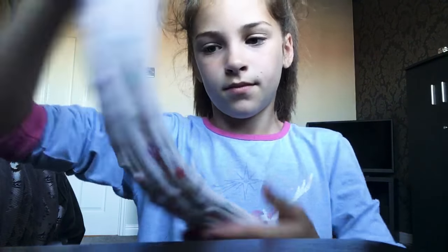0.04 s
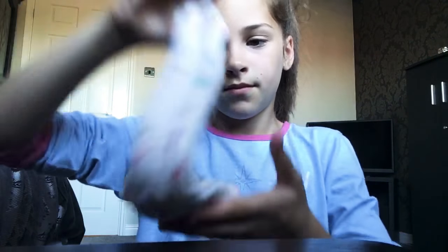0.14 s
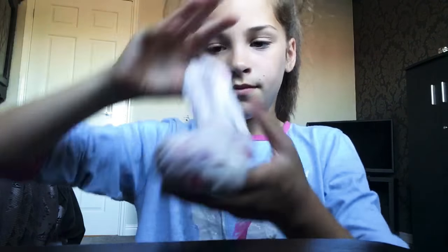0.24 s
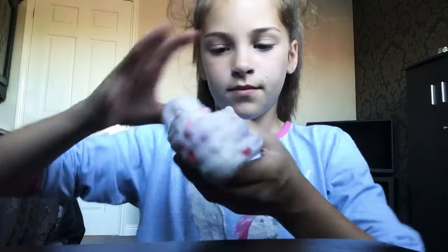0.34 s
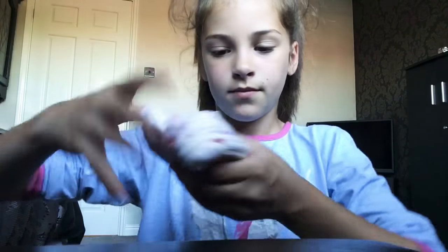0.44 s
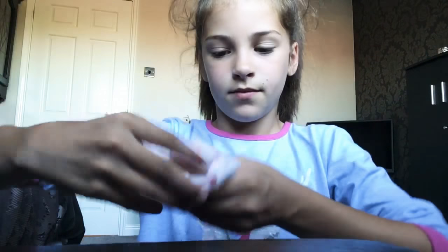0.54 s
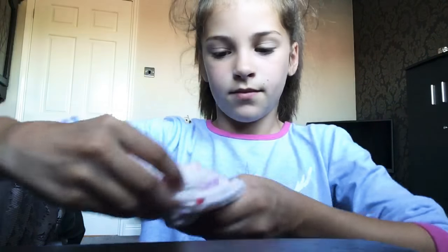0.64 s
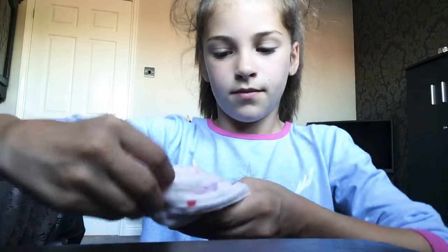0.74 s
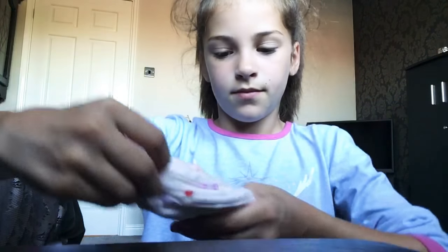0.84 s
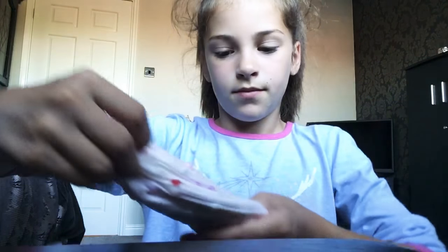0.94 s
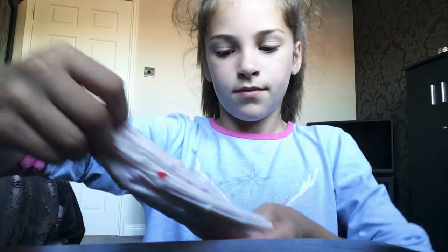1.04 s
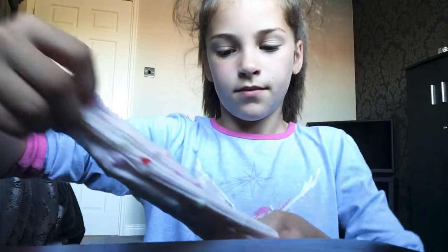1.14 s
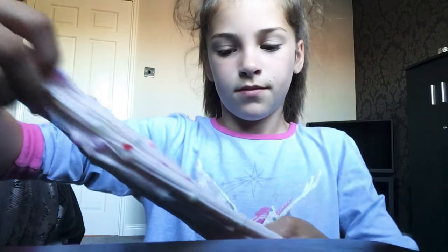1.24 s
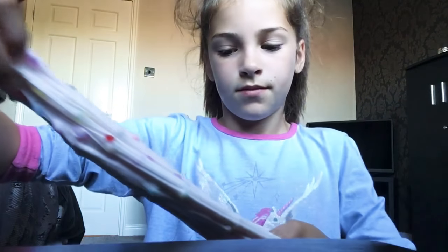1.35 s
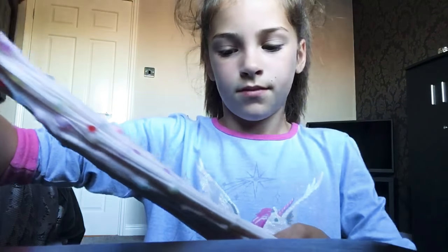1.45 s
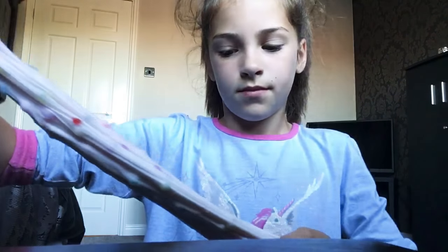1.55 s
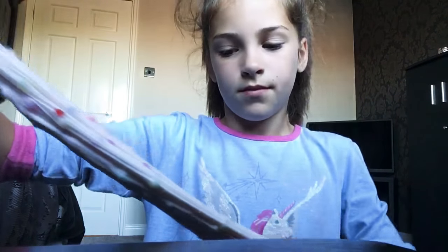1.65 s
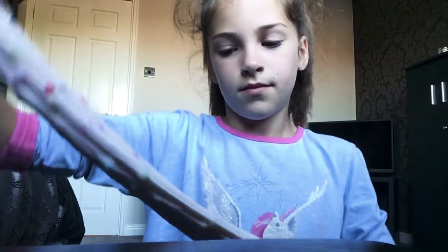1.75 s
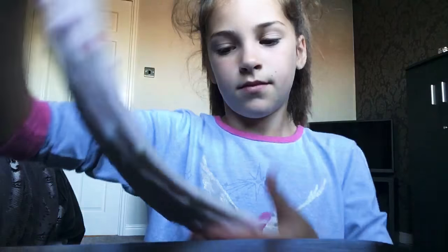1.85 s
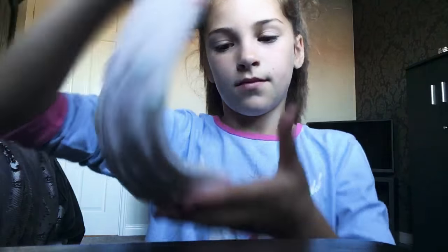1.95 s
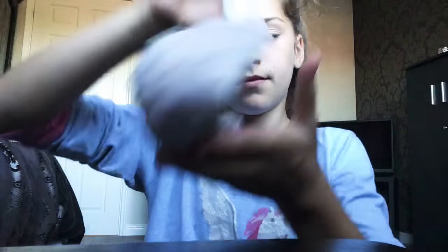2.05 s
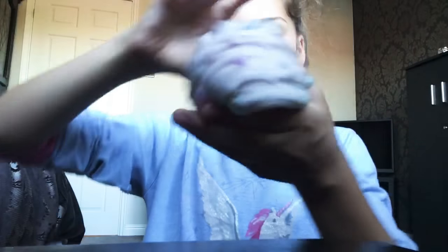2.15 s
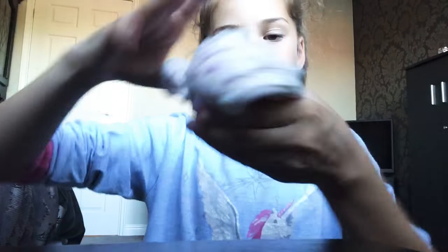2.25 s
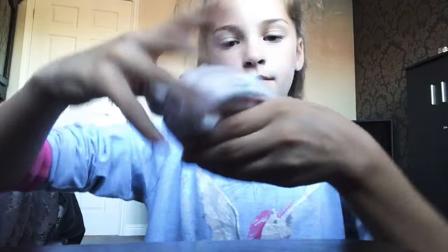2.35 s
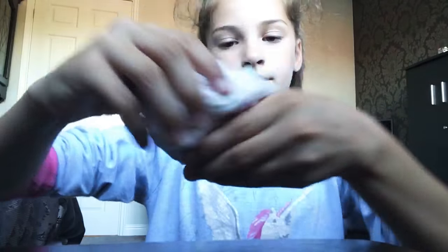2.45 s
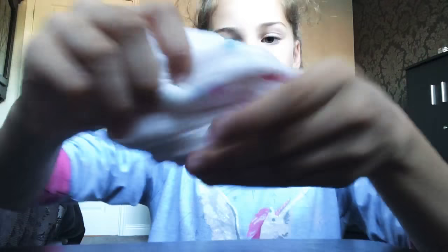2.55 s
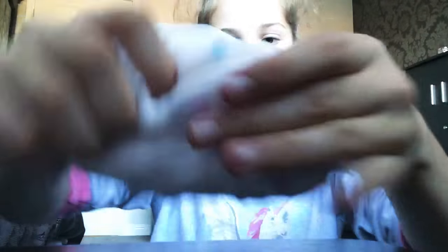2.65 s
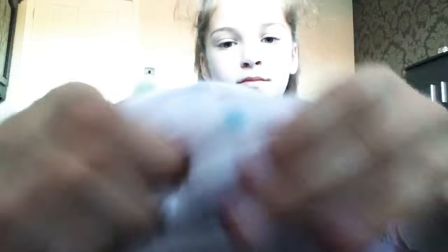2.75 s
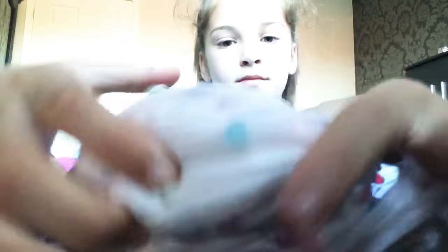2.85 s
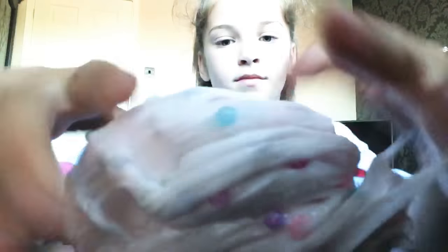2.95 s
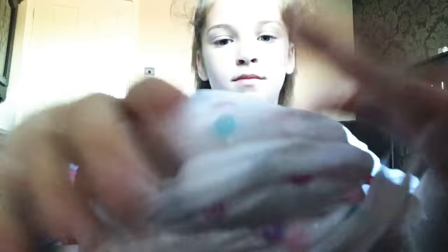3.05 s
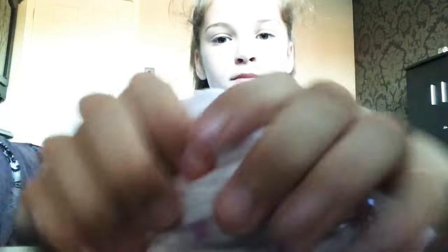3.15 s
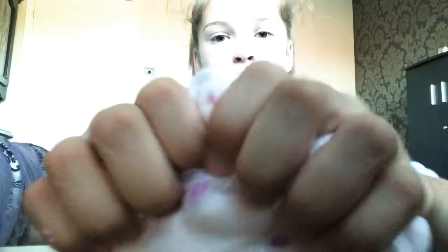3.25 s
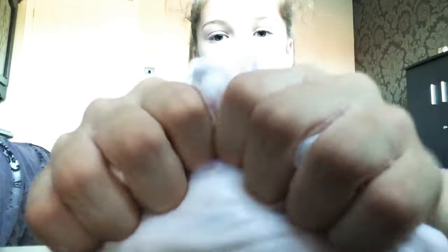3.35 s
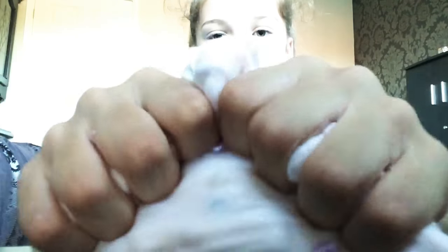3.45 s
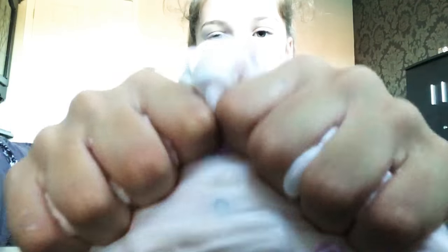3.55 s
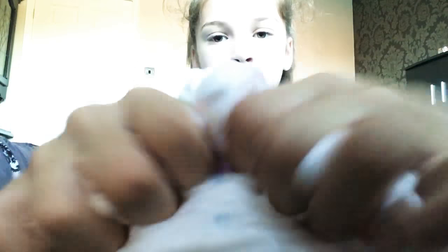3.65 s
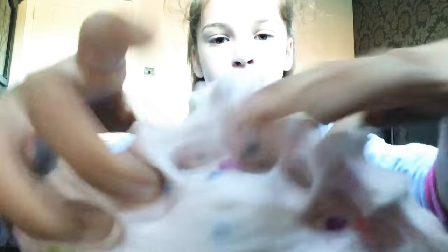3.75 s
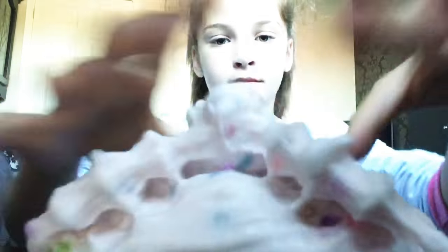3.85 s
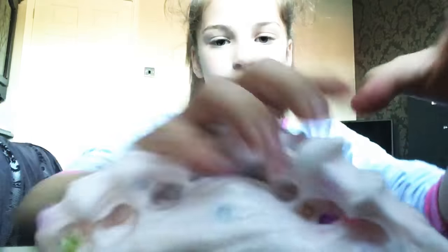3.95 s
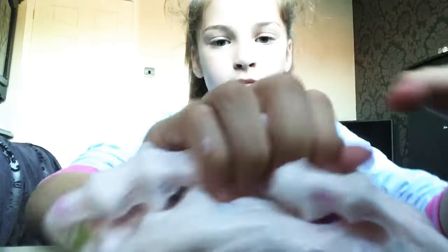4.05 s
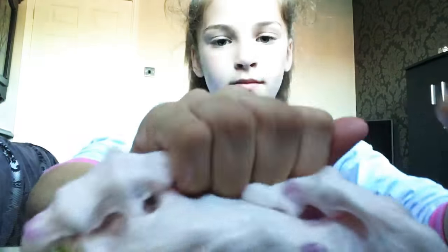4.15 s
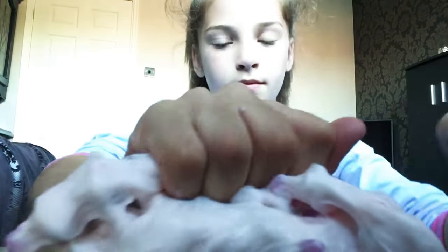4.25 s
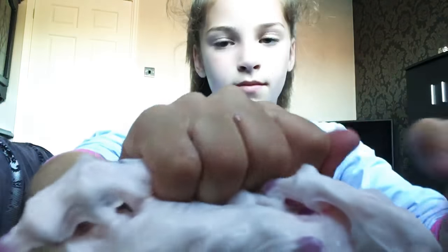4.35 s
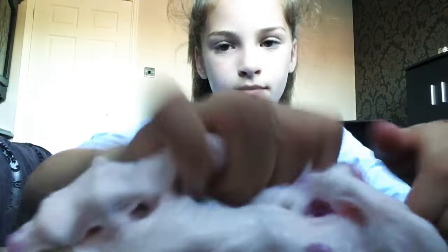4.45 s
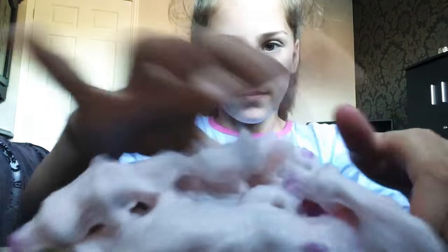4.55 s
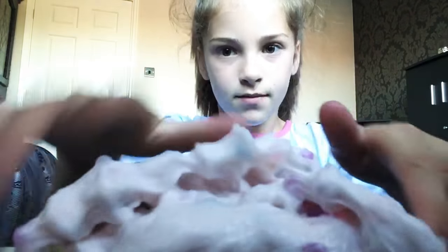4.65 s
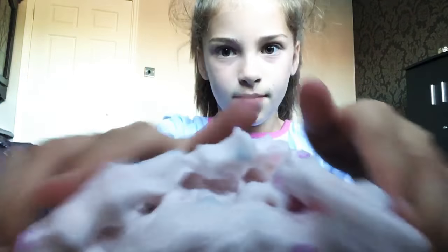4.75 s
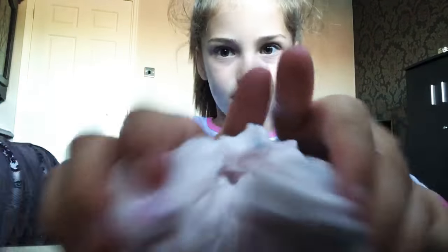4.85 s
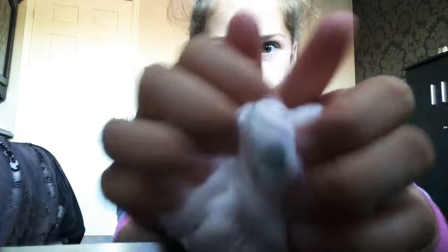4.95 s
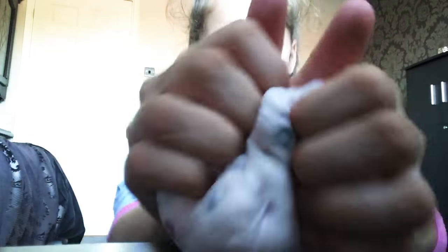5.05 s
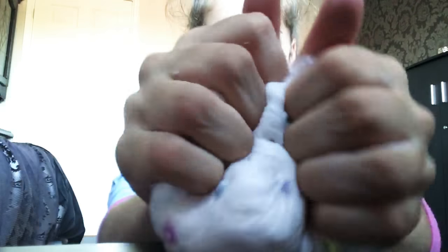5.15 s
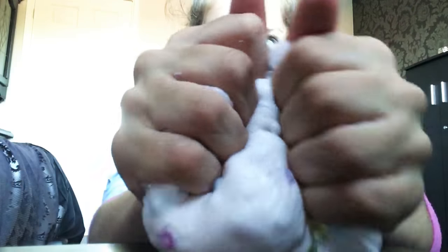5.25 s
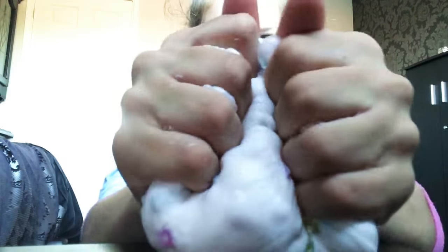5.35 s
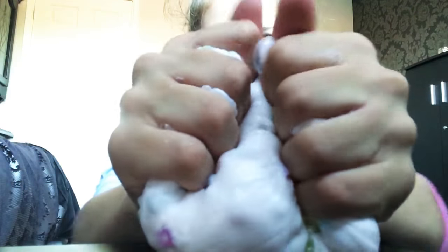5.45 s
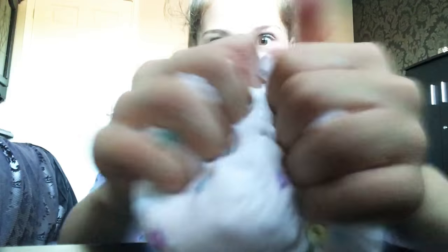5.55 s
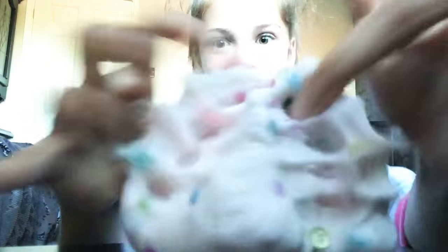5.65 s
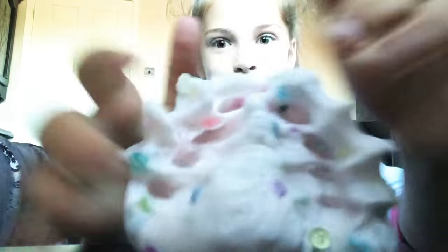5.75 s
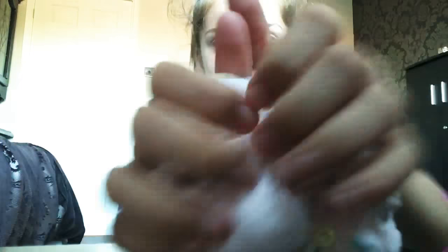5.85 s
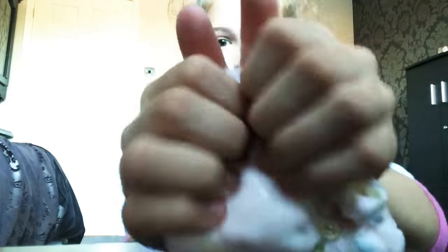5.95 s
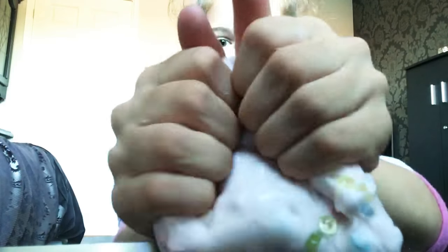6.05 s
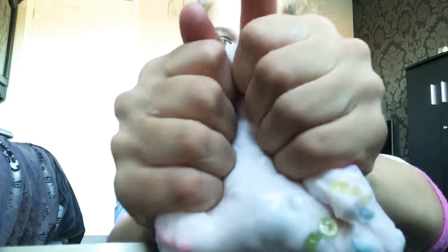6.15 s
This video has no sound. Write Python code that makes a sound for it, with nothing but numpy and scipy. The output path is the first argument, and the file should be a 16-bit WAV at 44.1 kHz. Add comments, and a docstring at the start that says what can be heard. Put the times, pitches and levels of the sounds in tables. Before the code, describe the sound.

Quiet hiss and a few faint ticks, then slime slaps a desk and crackles loudly under squeezing hands, with squelches and low bumps.

```python
"""Bead-filled slime is stretched, folded and squeezed on a desk close to a small microphone, in a quiet room.
Pops: trapped air pockets burst as damped pings of cavity, skin and slime, over a crackle of small grains.
Fizz: dense tiny bubble grains and noise, gated by strokes as the slime stretches, peels or squelches.
Desk: dispersed thuds, noise rumble and sinking stick-slip notes, all through the desk's resonances.
Behind: hiss, a wavering 101 Hz hum and a faint tick ten times a second."""
import sys
import numpy as np
from scipy import signal
from scipy.fft import rfft, irfft, next_fast_len
from scipy.io import wavfile
from scipy.ndimage import uniform_filter1d, minimum_filter1d, map_coordinates

SR = 44100
rng = np.random.default_rng(int(sys.argv[2]) if len(sys.argv) > 2 else 0)


def store_wav(level_fs):
    """Save 16-bit WAV to argv[1]."""
    pcm = np.round(np.clip(np.atleast_2d(level_fs), -1, 1) * 32767)
    wavfile.write(sys.argv[1], SR, pcm.T.astype(np.int16))


N = 272979

TOP_HZ = 16200  # upper band limit
BED_START_S = 3.2  # from here on a faint steady rumble and fizz lie under the strokes
LONG_RING_HZ, LONG_RING_Q = 2810, 2.9

# microphone hiss spectrum [f/Hz, density/dB per Hz]
HISS_SPECTRUM = [(25, -18), (55, 0), (100, 1), (200, -8), (500, -11.5), (1500, -14), (2900, -18.5),
                 (3300, -14), (3680, -8.5), (4000, -19), (8500, -20.5), (9400, -19), (10500, -25),
                 (16000, -33)]
# low hum swelling once [start/s, length/s, level/dB]
HUM_SWELL = [(1.52, 0.21, -65.5)]
# room decay [f/Hz, t60/s]
ROOM_T60 = [(200, 0.57), (2500, 0.16), (8000, 0.26), (15000, 0.19)]
# hollow desk resonances [f/Hz, width/Hz, level/dB]
DESK_MODES = [(90.1, 11.3, 2), (195.3, 10, -6), (281.2, 22, -3), (421, 20, 4), (486, 36, 0.5),
              (718, 19, 6.5), (957, 46, 12), (1210, 75, 10)]
# lump skidding on the desk [start/s, length/s, level/dB, starting f/Hz]
SKIDS = [(2.814, 0.024, -40.5, 406), (2.826, 0.035, -31.5, 199), (3.128, 0.04, -31, 359.3),
         (4.685, 0.0248, -41.5, 270), (4.765, 0.02, -33, 295), (4.831, 0.068, -32.5, 372)]
# hands leaning on the lump and shoving it [start/s, length/s, level/dB]
SHOVES = [(2.83, 0.079, -37), (3.02, 0.055, -38), (3.17, 0.2, -31.5), (3.73, 0.13, -36.5),
          (3.96, 0.52, -51.5), (4.53, 0.11, -28.5), (4.82, 0.088, -25.5), (5.08, 0.26, -47),
          (5.63, 0.5, -37.5)]
# rumble spectrum of the dragged lump [f/Hz, density/dB per Hz]
RUMBLE_SPECTRUM = [(25, -46.5), (55, 8.5), (90, 0), (135, -1.5), (190, -4), (300, -8.5), (600, -30),
                   (1500, -52)]
# thuds on the desk, and one wet chirping pop at 5.135 s [t/s, level/dB, hardness/dB]
THUDS = [(2.795, -29.5, 16), (2.822, -26.5, -6), (3.129, -16, -39), (3.153, -19.5, -26),
         (3.401, -16.5, -24), (3.465, -20, -22), (3.901, -14, -23), (3.958, -25, -58), (4.193, -21, -28),
         (4.769, -23, -28), (4.786, -16.5, -43), (4.861, -17.5, -35), (5.135, -23.5, 15), (6.008, -17, -28),
         (6.072, -14.5, -30)]
# thud spectrum [f/Hz, level/dB]
THUD_SPECTRUM = [(25, -39), (55, 5), (90, 2), (200, 2), (380, -12), (600, -19), (1000, -33), (2500, -36),
                 (8000, -114)]
# slime stretching, smearing or peeling, and short squelches as it slaps down [start/s, length/s, level/dB]
PEELS = [(0.07, 0.041, -62.5), (0.67, 0.067, -60.5), (1.815, 0.048, -58.5), (2.54, 0.12, -54),
         (2.79, 0.1, -42.5), (2.95, 0.042, -43), (3.14, 0.022, -51.5), (3.68, 0.084, -40.5),
         (3.735, 0.09, -35.5), (4.195, 0.026, -37), (4.5, 0.1, -38.5), (4.61, 0.44, -55.5),
         (4.925, 0.06, -48), (5.6, 0.12, -38.5), (5.84, 0.17, -50.5)]
# fizz spectrum [f/Hz, density/dB per Hz]
FIZZ_SPECTRUM = [(250, 8.5), (650, 3.5), (1000, -4), (1400, 0), (3200, -1.5), (5000, -11), (7000, -7),
                 (11000, -12), (16000, -21)]
# fists closing on the slime [start/s, length/s, level/dB]
SQUEEZES = [(2.46, 0.2, -57), (3.36, 0.17, -34), (4.19, 0.18, -47.5), (5.11, 0.35, -44), (6.04, 0.55, -48)]
# microphone colour on the pops and crackle [f/Hz, level/dB]
POP_COLOUR = [(400, 3), (650, 4.5), (1000, -2), (1400, 3.5), (2300, 0), (3200, 2), (5000, 0), (6200, 5.5),
              (8300, 2), (12500, 1)]
# single bursting air pockets, loud and faint [t/s, cavity level/dB, cavity f/Hz, skin snap level/dB, snap f/Hz]
POPS = [(0.5407, -55, 1660, -45, 6400), (0.8829, -43.5, 3330, -46.5, 7100),
        (1.2508, -43.5, 3100, -42.5, 13800), (2.401, -46, 1910, -49.5, 9900),
        (2.5306, -33.5, 2370, -57, 11100), (2.7525, -49, 2110, -39.5, 9040),
        (3.2248, -46.5, 2330, -45, 7700), (3.2864, -30, 2770, -27.5, 8550), (3.321, -25.5, 2380, -31, 7300),
        (3.3463, -15.5, 2600, -17, 7700), (3.3703, -34, 2480, -36, 8270), (3.3837, -13, 2300, -16.5, 7230),
        (3.402, -15, 2730, -16, 7050), (3.403, -30, 2510, -17.0, 7020), (3.4117, -12, 1800, -21, 5000),
        (3.4303, -18, 2430, -13, 9260), (3.4512, -15.5, 2400, -12.5, 6700),
        (3.4821, -11.5, 1990, -21.5, 9000), (3.5086, -10.5, 2560, -10.5, 8700),
        (3.514, -2.5, 2800, -13, 7550), (3.5224, -20.5, 2640, -24.5, 7910),
        (4.0128, -39.0, 2460, -45.5, 9600), (4.2129, -15.5, 2130, -29.5, 10700),
        (4.3001, -9, 3900, -17.5, 10000), (4.3221, -23.0, 2400, -15, 14500),
        (4.371, -35, 2510, -35.5, 11770), (4.384, -38, 2580, -35, 8350), (4.4805, -39, 2510, -39.5, 8900),
        (4.9413, -39.5, 2570, -38.5, 6600), (5.0625, -29, 1900, -33.5, 10120),
        (5.1075, -25.5, 1950, -19.5, 10300), (5.1362, -18.5, 2070, -26, 9550),
        (5.1923, -33.5, 2410, -21, 9800), (5.2181, -30, 2420, -31, 8990), (5.2291, -33, 2150, -20, 11000),
        (5.2514, -24, 2260, -18.5, 10900), (5.2824, -18.5, 2320, -18.5, 8900),
        (5.3236, -10, 2920, -7.5, 9400), (5.3792, -17, 2030, -10, 10270), (5.3923, -21.5, 2540, -33, 12320),
        (5.4515, -32, 2470, -32.5, 10000), (5.5454, -32.5, 2250, -32, 8920), (6.0518, -33, 2390, -39, 7100),
        (6.0979, -18.5, 2500, -24.5, 7600), (6.1196, -24, 2550, -35.5, 7850),
        (6.1672, -31.5, 2400, -33, 6500)]
# pockets ringing at one pitch only [t/s, level/dB, f/Hz]
PLOPS = [(2.5937, -35.5, 2430), (3.414, -23, 4640), (3.4231, -7.5, 2140), (3.4274, -23, 2320),
         (3.4471, -28, 7230), (3.4505, -9, 2300), (3.495, -28, 2180), (3.5161, -23, 2900),
         (4.1042, -36.5, 3220), (4.1866, -25.5, 2920), (4.193, -10, 2640), (4.2434, -26.5, 1960),
         (4.2745, -45, 11000), (4.3515, -20, 2180), (4.4248, -28.5, 1960), (4.4364, -37.5, 11800),
         (4.6189, -32, 3430), (5.1784, -47, 9370), (5.2641, -25, 2070), (5.2916, -25, 2080),
         (5.3101, -28.0, 12000), (5.3174, -32, 11000), (5.3405, -32, 8470), (5.3703, -34, 10000),
         (5.4305, -39, 11200), (5.7098, -29, 3970), (6.0639, -31, 2070), (6.1881, -26.5, 1980)]
# slime slumping into a large burst pocket [t/s, level/dB, f/Hz]
GULPS = [(3.3838, -28, 930), (3.4504, -16, 1050), (4.2447, -21, 580), (4.3517, -25, 734),
         (5.1075, -35, 590), (5.1363, -23.5, 570), (5.2824, -23, 630), (5.3794, -28, 640)]
# long ring of three late bursting pockets [t/s, level/dB]
LONG_RINGS = [(6.0972, -18), (6.1193, -27), (6.1673, -30)]


def amp(db):
    """Decibels to gain."""
    return 10 ** (np.asarray(db) / 20)


def unit(x):
    """Scale to rms 1."""
    return x / np.sqrt(np.mean(x ** 2) + 1e-20)


def along(points, hz):
    """Interpolate (Hz, value) points on a log-frequency axis."""
    point_hz, value = np.transpose(points)
    return np.interp(np.log(hz + 1), np.log(point_hz), value)


def wobble(rate_hz):
    """Smooth random curve, rate_hz knots per second."""
    return map_coordinates(rng.standard_normal(int(N * rate_hz / SR) + 4), [np.arange(N) * rate_hz / SR])


def filtered(x, response):
    """Apply a response, given as a function of Hz, to x."""
    size = next_fast_len(len(x) + 8192)
    return irfft(rfft(x, size) * response(np.fft.rfftfreq(size, 1 / SR)), size)[:len(x)]


def coloured(x, spectrum):
    """Shape x by a (Hz, dB) spectrum, at rms 1."""
    return unit(filtered(x, lambda hz: amp(along(spectrum, hz))))


def add(track, start_s, sound):
    """Mix a sound into the track at start_s."""
    part = track[max(round(start_s * SR), 0):][:len(sound)]
    part += sound[:len(part)]


def ping(hz, q):
    """Heavily damped resonance with steep flanks, with the energy of 1 ms at rms 1."""
    f = np.fft.rfftfreq(1024, 1 / SR)
    band = 1j * f * hz / q / (hz * hz - f * f + 1j * f * hz / q)
    wave = irfft(band ** 4 * (f < TOP_HZ))
    return wave / np.sqrt(np.sum(wave ** 2) / (SR / 1000))


def strokes(rows, rise_s, fall_s, arch_db, peak_at=0.49):
    """Summed stroke gains: each swells, arches to a peak and dies away; rise and fall are times per 20 dB."""
    t = np.arange(N) / SR
    gain = np.zeros(N)
    for start_s, length_s, db in rows:
        progress = np.clip((t - start_s) / length_s, 0, 1)
        before = np.maximum(start_s - t, 0) / rise_s
        after = np.maximum(t - start_s - length_s, 0) / fall_s
        arch = arch_db * (2 * (progress - peak_at)) ** 2
        gain += amp(db - 20 * (before + after) - arch)
    return gain


def bed():
    """Gain of the steady rumble and fizz: rises from 0 to 1 around BED_START_S, then holds."""
    return uniform_filter1d(1.0 * (np.arange(N) / SR > BED_START_S), size=1000)


def grip():
    """Squeeze gain: each squeeze tightens to just past its middle, then lets go."""
    return strokes(SQUEEZES, rise_s=0.093, fall_s=0.06, arch_db=2.0, peak_at=0.59)


def bubbles(per_second, spread_db, centre_hz, q):
    """Bubbles of random size break at random times, most weak and a few strong; rms 1."""
    count = int(per_second * N / SR)
    when, size, pitch, life, polarity = rng.random((count, 5)).T
    hz = np.clip(centre_hz * (pitch / (1 - pitch)) ** 0.4, 700, 11500)[:, None]
    t = np.arange(200) / SR
    decay_per_s = np.pi * hz / (q * (0.5 + life[:, None]))
    gain = amp(spread_db * np.minimum(-np.log(1 - size), 3))[:, None] * np.sqrt(decay_per_s)
    envelope = decay_per_s * t * np.exp(-decay_per_s * t)
    sign = np.sign(polarity - 0.5)[:, None]
    grains = gain * envelope * np.sin(2 * np.pi * hz * t) * sign
    place = (when * N).astype(int)[:, None] + np.arange(len(t))
    return unit(np.bincount(place.ravel(), grains.ravel(), N)[:N])


def patchy(x, depth_db):
    """Bubbles of like size break in clusters: random gain patches in time and frequency shift the colour."""
    z = signal.stft(x, nperseg=512)[2]
    field = uniform_filter1d(rng.standard_normal(z.shape), size=12, axis=0)
    field = uniform_filter1d(field, size=6, axis=1)
    return signal.istft(z * amp(depth_db * unit(field)), nperseg=512)[1][:N]


def background(hiss_db=-68.0, hum_db=-76):
    """Microphone hiss, a wavering hum that swells once and a faint electrical tick ten times a second."""
    hiss = amp(hiss_db) * coloured(rng.standard_normal(N), HISS_SPECTRUM)
    swell = amp(hum_db) + strokes(HUM_SWELL, rise_s=0.27, fall_s=0.081, arch_db=7)
    hum = swell * amp(2 * wobble(3)) * np.sin(2 * np.pi * 101 * np.arange(N) / SR)
    ticks = np.zeros(N)
    for tick_s in np.arange(0, N / SR, 1 / 10):
        add(ticks, tick_s, amp(-54) * ping(3330, 2.5))
    return hiss + hum + ticks


def room(x, tail_db=-20.0, build_s=0.0055):
    """Wall echoes: a noise tail builds up, then dies at its own speed in each band."""
    hz, t, z = signal.stft(rng.standard_normal(SR // 2), SR, nperseg=256)
    build = 1 - np.exp(-t / build_s)
    decay = amp(-60 * t / along(ROOM_T60, hz)[:, None])
    tail = signal.istft(z * build * decay, SR, nperseg=256)[1]
    return amp(tail_db) * signal.fftconvolve(x, tail / np.linalg.norm(tail))[:N]


def alternating_room(x, count=3):
    """Successive 16 ms slices of sound take turns through three random echo tails."""
    turn = np.arange(N) // 700 % count
    return sum(room(x * (turn == k)) for k in range(count))


def desk(x):
    """The hollow desk rings on at its resonances, beside the direct knock."""
    def response(f):
        ring = 0
        for hz, width_hz, db in DESK_MODES:
            ring = ring + amp(db) * 1j * f * width_hz / (hz * hz - f * f + 1j * f * width_hz)
        return 0.84 + ring
    return filtered(x, response)


def surfaces(x, near_db=-10, near_t60_s=0.023):
    """Hands and desk scatter the sound at once, which ripples its spectrum."""
    t = np.arange(SR // 20) / SR
    near = rng.standard_normal(len(t)) * amp(-60 * t / near_t60_s)
    return x + amp(near_db) * signal.fftconvolve(x, near / np.linalg.norm(near))[:N]


def pop_colour(x):
    """Microphone colour on the pops and crackle, as a minimum-phase filter: it rings only after each burst."""
    def response(hz):
        cepstrum = irfft(np.log(amp(along(POP_COLOUR, hz))))
        half = len(cepstrum) // 2
        return np.exp(rfft(np.r_[cepstrum[0], 2 * cepstrum[1:half]], 2 * half))
    return filtered(x, response)


def skids(skid_db=-1, sag_db_per_s=28, overtone_db=-17):
    """The lump sticks and slips on the desk: a rough, squelching note that sinks as it slows."""
    track = np.zeros(N)
    t = np.arange(SR // 8) / SR
    for start_s, length_s, db, hz in SKIDS:
        rough = (wobble(80) + 1j * wobble(80))[:len(t)]
        phase = 2 * np.pi * np.cumsum(hz * amp(-sag_db_per_s * t)) / SR
        tones = np.exp(1j * phase) + amp(overtone_db) * np.exp(2j * phase)
        note = unit(np.real(rough * tones))
        sliding = 1.0 * ((t > 0.003) & (t < length_s))
        gate = uniform_filter1d(sliding, size=260, mode="constant")
        add(track, start_s, amp(db + skid_db) * note * gate)
    return track


def kneading(rumble_db=-8.0, bed_db=-57):
    """The lump drags over the desk in uneven shoves: noise rumble under a wobbling gain."""
    weight = strokes(SHOVES, rise_s=0.061, fall_s=0.06, arch_db=1) + amp(bed_db) * bed()
    rumble = coloured(rng.standard_normal(N), RUMBLE_SPECTRUM)
    return weight * amp(rumble_db + 3.74 * wobble(19)) * rumble


def thuds(lag_s=0.01206, dispersion=0.85, level_db=-1, hard_tilt=0.34, edge_db=-11, edge_s=0.026):
    """Bending waves: high notes arrive first, so each thud sweeps down; the far edge reflects it, duller."""
    track = np.zeros(N)
    hz = np.fft.rfftfreq(8192, 1 / SR)
    octaves = np.log2(np.clip(hz, 100, 600) / 100)
    for (start_s, db, hard_db), chance_db in zip(THUDS, rng.standard_normal((len(THUDS), 2))):
        delay_s = lag_s * amp(chance_db[0]) * (100 / (hz + 20)) ** dispersion
        gain = amp(along(THUD_SPECTRUM, hz) + hard_tilt * (hard_db + 22.5) * octaves)
        # phase = integral of the group delay over frequency
        wave = irfft(gain * np.exp(-2j * np.pi * np.cumsum(delay_s) * hz[1]))
        wave = amp(db + level_db) * wave / np.abs(wave).max()
        add(track, start_s, wave)
        reflection = amp(edge_db) * uniform_filter1d(wave, size=60)
        add(track, start_s + edge_s * amp(chance_db[1]), reflection)
    return track


def fizz(peel_db=-1, squeeze_db=-10, bed_db=-66):
    """Peeling breaks a dense mass of tiny wet bubbles, over a mist of finer ones; squeezing breaks fewer."""
    wet = bubbles(per_second=2600, spread_db=6, centre_hz=4200, q=2.4)
    mist = amp(-4) * rng.standard_normal(N)
    froth = patchy(wet + mist, depth_db=1.9)
    stickiness_db = 1.9 * wobble(70)
    peeling = amp(peel_db) * strokes(PEELS, rise_s=0.046, fall_s=0.04, arch_db=2.5)
    squeezing = amp(squeeze_db) * grip()
    steady = amp(bed_db) * bed()
    breaking = np.sqrt(peeling ** 2 + squeezing ** 2 + steady ** 2)
    return breaking * amp(stickiness_db) * coloured(froth, FIZZ_SPECTRUM)


def crackle(crackle_db=-1, film_db=-7, idle_db=-76):
    """Small pockets and thin films between the beads snap singly: loudly in the fists, faintly throughout."""
    pockets = amp(crackle_db) * bubbles(per_second=130, spread_db=5, centre_hz=2400, q=1.2)
    films = amp(film_db) * bubbles(per_second=110, spread_db=5, centre_hz=8800, q=1.8)
    idle = amp(idle_db) * bubbles(per_second=40, spread_db=2.6, centre_hz=2400, q=1.6)
    return grip() * (pockets + films) + idle


def pops(cavity_q=0.66, snap_q=1.14, cavity_db=-0.26, snap_db=-0.4, give_db=-19, give_hz=620):
    """A pocket's skin snaps at its own pitch, its cavity rings briefly and the slime around it gives way."""
    track = np.zeros(N)
    scatter = amp(1.3 * rng.standard_normal((len(POPS), 3)))
    for (start_s, body_db, body_hz, skin_db, skin_hz), vary in zip(POPS, scatter):
        cavity = amp(body_db + cavity_db) * ping(body_hz, cavity_q * vary[0])
        snap = amp(skin_db + snap_db) * ping(skin_hz, snap_q * vary[1])
        give = amp(body_db + give_db) * ping(give_hz * vary[2], cavity_q)
        add(track, start_s, cavity + snap + give)
    for start_s, db, hz in list(PLOPS) + list(GULPS):
        add(track, start_s, amp(db + cavity_db) * ping(hz, cavity_q))
    for start_s, db in LONG_RINGS:
        add(track, start_s, amp(db) * ping(LONG_RING_HZ, LONG_RING_Q))
    return track


def scene(desk_wet_db=-3):
    """Pops, crackle, fizz and desk knocks with their room echoes, over the background."""
    slime = surfaces(pop_colour(pops() + crackle()) + fizz())
    knocks = desk(thuds() + kneading() + skids())
    echoes = alternating_room(slime + amp(desk_wet_db) * knocks)
    return (slime + knocks + echoes + background())[None]


def record(dry, low_cut_hz=40):
    """Microphone: drops the deepest bass, limits the sharpest pops fast and cuts steeply above TOP_HZ."""
    lean = signal.sosfilt(signal.butter(2, low_cut_hz, "high", fs=SR, output="sos"), dry[0])
    needed = 0.95 / np.maximum(np.abs(lean), 0.95)
    gain = uniform_filter1d(minimum_filter1d(needed, size=15), size=15)
    return filtered(lean * gain, lambda hz: 1 / (1 + (hz / TOP_HZ) ** 120))[None]


dry = scene()
out = record(dry)
store_wav(out)
```